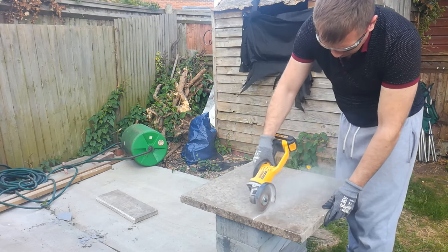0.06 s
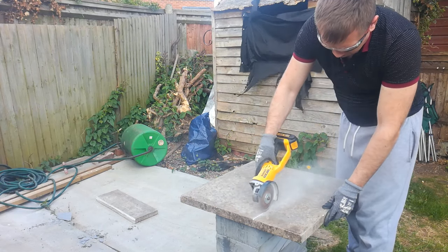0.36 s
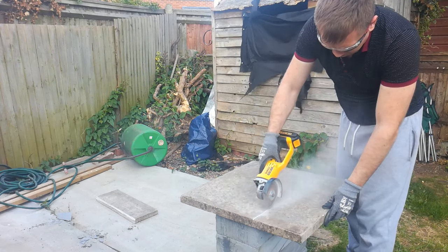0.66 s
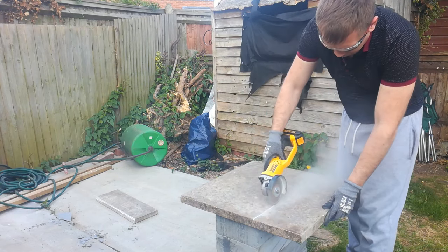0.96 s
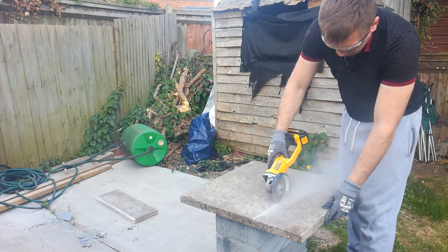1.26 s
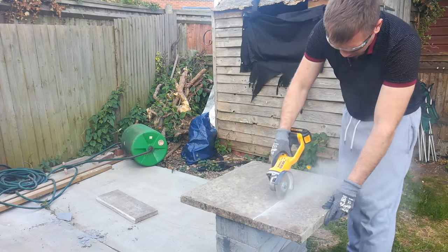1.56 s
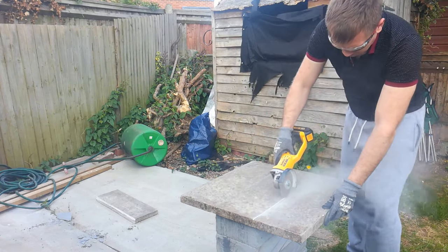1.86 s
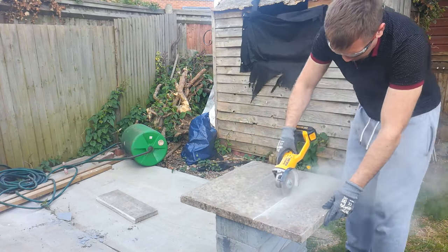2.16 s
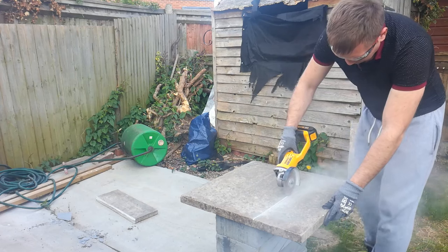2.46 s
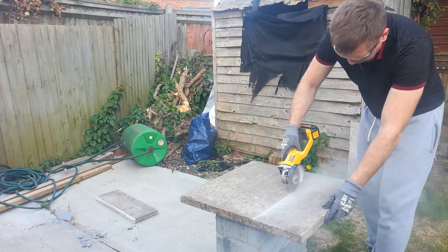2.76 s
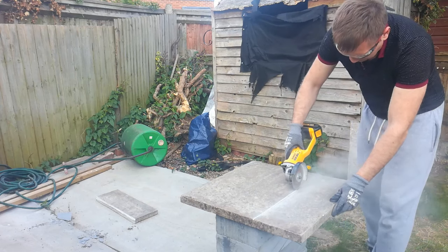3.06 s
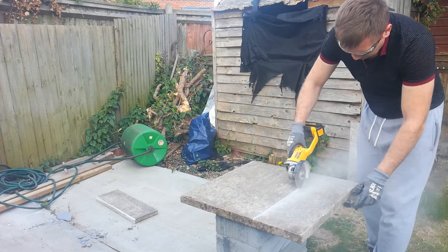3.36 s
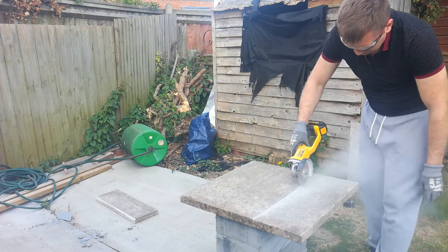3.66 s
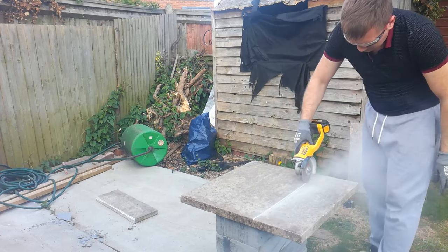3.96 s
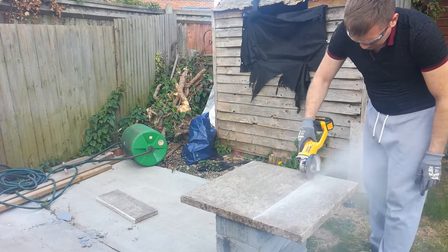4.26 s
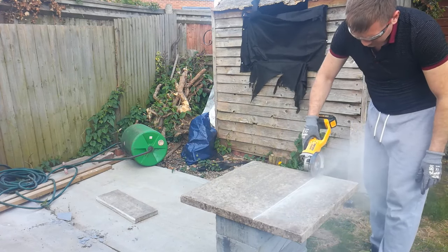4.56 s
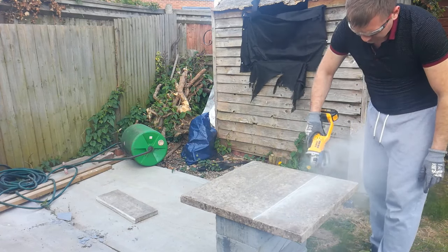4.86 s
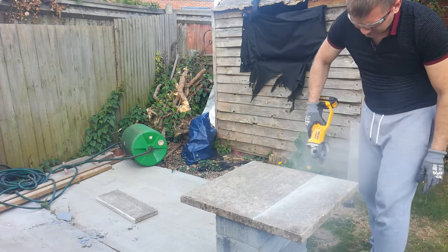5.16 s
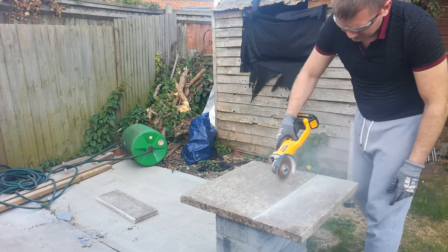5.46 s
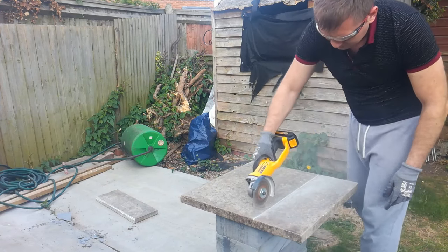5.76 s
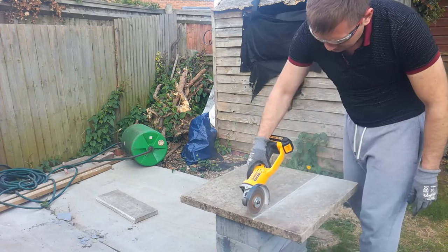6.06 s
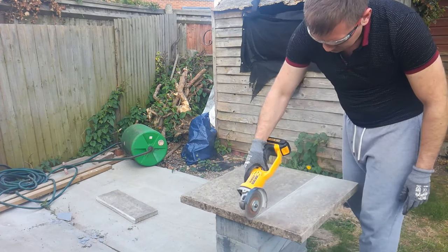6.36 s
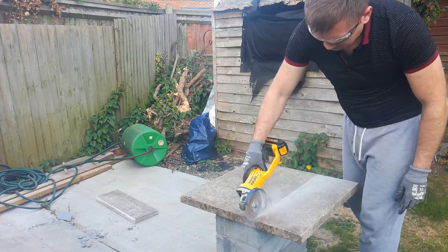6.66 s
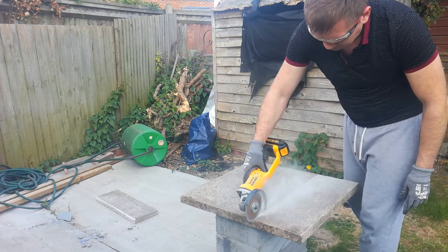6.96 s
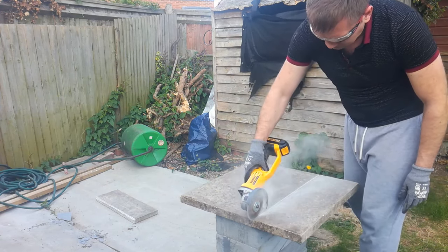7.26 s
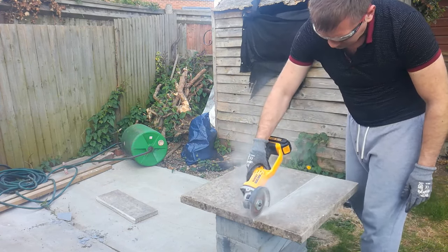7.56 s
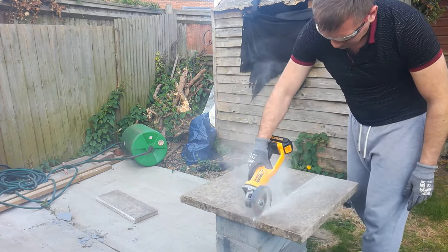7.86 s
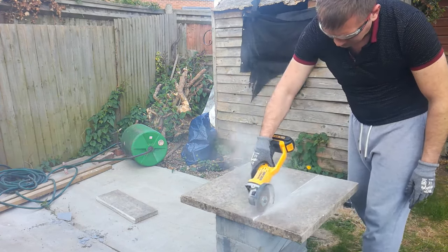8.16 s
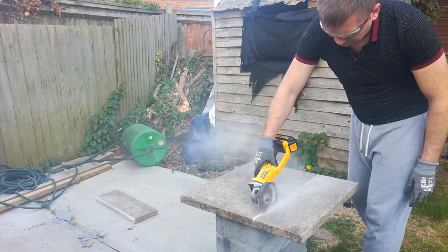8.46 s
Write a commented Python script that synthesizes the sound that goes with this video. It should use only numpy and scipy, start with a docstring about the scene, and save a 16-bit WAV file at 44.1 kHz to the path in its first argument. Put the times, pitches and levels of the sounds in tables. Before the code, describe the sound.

A cordless angle grinder is already cutting a concrete slab, with a gritty hiss, steely ringing and a swelling drone. Just past halfway the disc lifts out and briefly coasts down, then spins up with a strained gear whine. It bites again, sagging in pitch and squealing as the rim catches. The yard adds short echoes, and a rising breeze rumbles on the microphone during the second cut.

```python
"""A cordless angle grinder scores a concrete slab in a fenced yard. It opens mid-cut: the diamond disc scrapes
and rings over a swelling friction drone. Near 4.9 s it is lifted out, coasts down with the trigger released,
then spins up again with a strained gear whine. At 6.2 s it bites a second score, where the load drags its speed
down and the disc squeals, while a rising breeze buffets the microphone."""
import sys
import numpy as np
from scipy import signal
from scipy.fft import rfft, irfft, next_fast_len
from scipy.io import wavfile
from scipy.ndimage import map_coordinates

SR = 44100
rng = np.random.default_rng(int(sys.argv[2]) if len(sys.argv) > 2 else 0)


def master(y):
    """Save y as 16-bit WAV."""
    cut = np.clip(np.atleast_2d(y).T, -1, 1)
    pcm = np.round(cut * 32767)  # scale
    wavfile.write(sys.argv[1], SR, pcm.astype(np.int16))


N = 380141
TIME = np.arange(N) / SR
LIFT_S, RELEASE_S, PRESS_S, BITE_S = 4.885, 5.16, 5.705, 6.217  # disc out, trigger off, on, disc in
FREE_SPEED = 100  # unloaded disc, turns/s
GEAR_ORDER, PINION_ORDER, WHISTLE_ORDER = 32, 39 / 11, 9.69  # cycles per disc turn

# EQ of the cut's body, bite and top end: f/Hz, level/dB
SCRAPE_EQ = [(60, -87), (300, -25.5), (500, -18.5), (800, -15.5), (1500, -9), (1900, -7), (2300, -3),
             (3000, 4.5), (4300, 2.5), (5300, -11), (7000, -3.5), (10000, -32)]
GRIT_EQ = [(2000, -29), (4600, -5), (5300, -4.5), (6000, -3.5), (6700, -1.5), (8000, -1), (11000, 1),
           (12000, -6.5), (13000, -32), (16000, -32)]
SIZZLE_EQ = [(9000, -47), (11500, -17), (12500, -2), (13300, -5.5), (15700, -1.5)]
# fader rides, one list per score: t/s, grit/dB, sizzle/dB
CUT_RIDES = [
    [(0.05, -24, -28), (0.08, -24.5, -27), (0.93, -25.5, -28.5), (1.62, -22, -24), (1.83, -23, -25.5),
     (2.54, -22, -24), (2.73, -23.5, -28), (4.82, -23.5, -28), (4.86, -22.5, -27)],
    [(6.24, -24, -28), (6.26, -28.5, -32), (6.53, -23.5, -24.5), (7.69, -24.5, -24.5), (7.73, -22.5, -22),
     (7.96, -26.5, -24.5), (8.22, -22.5, -21.5), (8.51, -24.5, -25.5), (8.62, -20.5, -22)],
]
# hard stones that the rim bites through: t/s, accent/dB
STONES = [(1.595, 3), (2.57, 0.5), (3.315, 2), (3.68, 2), (6.345, 2.5), (6.97, 3.5), (7.23, 2.5)]
# bending modes of the steel disc: f/Hz, width/Hz, boost in first score/dB, in second score/dB
DISC_MODES = [(2223, 157, 7, 4), (4766, 75, 8.5, 6.5), (4957, 52, 7, 7.5), (5616, 37, 13, 10),
              (6290, 150, 5, 5), (6816, 120, 5, 8), (7130, 150, 5.5, 9), (7766, 225, 8, 9),
              (8610, 184, 8, 10.5), (9880, 300, 5.5, 7), (10500, 150, 1.5, 4), (10720, 66, 9.5, 0),
              (11600, 390, 7, 7), (12730, 115, 7, 12), (13800, 130, -2, 8), (14200, 60, 11.5, 9),
              (15300, 170, 0, -10)]
# low modes of the binding disc, one list per score: f/Hz, width/Hz, level/dB
CHATTER_MODES = [
    [(1082, 9.9, 5.5), (1156, 39, -9), (1190, 52, -16), (1338, 25, -6), (1772, 36, -0.5)],
    [(1086, 12, -4), (1144, 28, -3.5), (1210, 22, 2.5), (1821, 45, -0.5)],
]
# chatter ride, one list per score: t/s, level/dB
CHATTER_RIDES = [
    [(0.0, -51.5), (0.9, -49), (1.75, -46), (2.0, -50), (2.3, -49), (2.9, -49), (3.2, -50.5), (4.15, -50.5),
     (4.69, -42.5), (4.88, -42)],
    [(6.22, -51), (6.55, -40), (6.9, -44), (7.05, -44.5), (7.4, -42.5), (7.75, -41.5), (7.86, -43),
     (8.15, -37.5), (8.45, -39), (8.62, -39.5)],
]
# buzz of the uneven rim: multiple of disc speed, level in first score/dB, in second score/dB
RIM_BUZZ = [(2, -20.5, -13), (8, -11, -16.5), (9, -19, -17.5), (13, -8, -11.5), (14, -9, -5.5),
            (15, -9.5, -24), (16, -33, -8.5), (18, -12, -12.5)]
# ride of the disc's lowest mode: t/s, level/dB
DRONE_RIDE = [(0, -67), (.9, -55), (1.35, -46.5), (2.0, -44), (2.4, -38.5), (2.74, -39), (2.82, -45),
              (3.05, -41.5), (3.4, -45), (3.87, -59), (4.2, -45), (4.5, -36.5), (4.61, -36.5),
              (4.72, -31.5), (4.85, -29.5), (4.92, -47), (5.15, -72), (6.4, -63), (6.55, -41), (6.61, -59),
              (6.68, -47), (6.85, -40), (7.08, -51), (8.62, -57)]
# squeals, each a disc mode that swells and breaks off: peak t/s, swell/s, f/Hz, waver/Hz, level/dB
SQUEALS = [(0.029, .1, 1222, 4, -41), (.25, .1, 1217, 4, -41), (2.169, 0.062, 1154, 21, -38),
           (2.339, .1, 1130, 20, -39), (2.48, 0.1, 1145, 22, -43), (4.71, 0.28, 1230, 11.5, -42.5),
           (4.88, 0.055, 1216, 10, -40), (6.42, .04, 1760, 6, -38), (6.53, 0.09, 1196, 3, -39.5),
           (6.571, 0.055, 1100, 13, -38.5), (6.709, 0.045, 1212, 3.3, -36.5), (6.9, 0.081, 1215, 2.4, -35),
           (6.99, .04, 5600, 20, -33), (7.21, .09, 5660, 20, -35), (7.319, .05, 1797, 7.5, -40),
           (7.48, 0.072, 1210, 3, -40.5), (7.67, 0.042, 1222, 2.9, -32.5), (7.77, 0.12, 1214, 3.3, -33),
           (7.92, .025, 1183, 4.6, -36.5), (8.08, 0.058, 2240, 5.4, -33.5), (8.275, 0.17, 1210, 2.6, -26.5),
           (8.32, 0.027, 1794, 6.2, -36.5), (8.42, 0.07, 1050, 2.9, -33), (8.53, .13, 1222, 3.65, -32)]
# disc speed under load, one list per score: t/s, speed/(turns/s)
LOADED_SPEED = [
    [(0, 92.7), (.6, 91.9), (.95, 92.3), (1.6, 90.1), (2.35, 89), (2.9, 89.5), (3.65, 89.1), (4.25, 89.6),
     (4.85, 88.4)],
    [(6.3, 98.5), (6.6, 91.3), (6.85, 86.6), (7.1, 86.4), (7.35, 84), (7.6, 82), (7.9, 78.9), (8.3, 81.3),
     (8.62, 80.2)],
]
# gear whine under load, one list per score: t/s, level/dB
WHINE_RIDES = [
    [(0, -29.5), (.65, -31), (1.2, -40.5), (4.85, -38)],
    [(6.3, -36), (6.6, -33), (6.95, -28.5), (7.2, -31), (7.35, -36.5), (7.7, -34.5), (8.1, -39),
     (8.62, -41)],
]
# motor shaft partials: multiple of shaft speed, level/dB, boost at full torque/dB
SHAFT_PARTIALS = [(1, -53.5, -6), (2, -56.5, -6), (8, -37.5, 6), (9, -49.5, 13), (10, -52, 20),
                  (20, -47, -8)]
# how the housing colours the mechanics: f/Hz, gain/dB
HOUSING_EQ = [(620, -14.5), (720, -6), (825, 2.5), (900, 1), (980, -3), (1900, -7), (2250, -7), (2550, 0),
              (3150, -3), (3700, 4), (4400, 2.5), (4680, 6.5), (5100, 2.5), (6200, -2), (6800, -6),
              (8000, -8)]
# colour of the cooling air: f/Hz, level/dB
AIR_EQ = [(88, -55), (150, -37), (270, -34), (370, -18.5), (646, -26.5), (815, -14), (1030, -14.5),
          (2240, -8), (2620, -3.5), (3400, -1.5), (4200, -7), (5500, -3.5), (15700, -19)]
# the lifted disc turns to the microphone and away: t/s, hiss gain/dB, low ring/dB, high ring/dB
LIFTED_RIDE = [(4.95, -0.5, -54, -44), (5.18, -0.5, -47, -48), (5.3, 2.5, -44, -57), (5.55, 1.5, -42, -64),
               (5.8, -0.5, -60, -64), (5.95, -1, -65, -64), (6.25, -0.5, -58, -55)]
# disc modes that sing in the air stream: f/Hz, width/Hz, level/dB
AIR_MODES = [(4690, 60, 0), (6850, 170, 0)]
# the left channel lags as the tool moves along the slab: t/s, delay/ms
LEFT_DELAY = [(0, 0.069), (2, 0.095), (4.7, 0.13), (6, 0.06), (8.6, 0.063)]
# shading of the two microphone ports: f/Hz, left over right/dB
PORT_BALANCE = [(300, -0.5), (500, 1.5), (623, -9), (870, 10), (1070, -10.5), (1212, 1), (1900, 7),
                (2500, -0.5), (3000, -6), (3600, 0.5), (4000, 5), (5500, 1), (8000, -8.5), (15000, -8.5)]
# reverb time of the yard: f/Hz, t60/s
YARD_DECAY = [(200, 0.0065), (2000, 0.31), (12000, 0.069)]
# ride of the wind bed: t/s, level/dB
BREEZE_RIDE = [(0, -80), (3.2, -74), (3.5, -69), (4.2, -67), (4.7, -71), (5.7, -76), (5.92, -57.5),
               (6.5, -48.5), (8.62, -45)]
# single wind bumps: t/s, peak level/dB
GUSTS = [(3.52, -63), (4.15, -60), (5.97, -59), (6.19, -46), (6.54, -41), (6.78, -42.5), (7.23, -38.5),
         (7.42, -39), (7.64, -38), (8.26, -39)]


def score(turns, index, runout_db, lumps_db, chips_db, repeat, scrape_db, grit_db, sizzle_db, chatter_db):
    """One cut: the rim grinds through the stones of the slab and rings the disc."""
    grit_ride, sizzle_ride = curves(CUT_RIDES[index])
    scrape_follows = (0.72, 0.95)[index]  # dB of scrape per dB of grit
    scrape_ride = scrape_follows * (grit_ride - np.mean(CUT_RIDES[index], axis=0)[1])
    chatter_ride, = curves(CHATTER_RIDES[index])
    # the high side of the disc bites once a turn; pebbles and breaking chips jolt it at random
    angle = 2 * np.pi * turns
    bite_db = runout_db * (np.cos(angle) + 0.087 * np.cos(2 * angle - 0.9))
    bite_db += lumps_db * (wobble(170) + 0.29 * wobble(28))
    bite_db += chips_db * (0.4 * roughness(turns, wear_rate=8, size=12) + 0.95 * wobble(1100))
    bite_db += sum(db * bump(s, width_s=0.018) for s, db in STONES)
    # repeat is the share of the friction's power that loops with each turn
    force = np.sqrt(repeat) * roughness(turns, wear_rate=3, size=128) + np.sqrt(1 - repeat) * noise()
    friction = [force * amp(0.6 * bite_db), noise() * amp(bite_db), noise() * amp(0.77 * bite_db)]
    steel = filtered(friction, lambda hz: disc_response(hz, index))
    scrape = amp(scrape_ride + scrape_db) * coloured(steel[0], SCRAPE_EQ)
    grit = amp(grit_ride + grit_db) * coloured(steel[1], GRIT_EQ)
    sizzle = amp(sizzle_ride + sizzle_db) * coloured(steel[2], SIZZLE_EQ)
    # a binding disc chatters in its low modes and buzzes in step with its turning
    buzz = sum(amp(db[index]) * tone(turns, order=round(k), waver=0.59) for k, *db in RIM_BUZZ)
    chatter = amp(chatter_ride + chatter_db) * (ringing(force, CHATTER_MODES[index]) + buzz)
    return contact(index) * (scrape + grit + sizzle + chatter)


def disc_response(hz, index):
    """The disc's bending modes give the friction its steely colour."""
    peaks = sum((amp(boost_db[index]) ** 2 - 1) / (1 + (2 * (hz - centre) / width) ** 2)
                for centre, width, *boost_db in DISC_MODES)
    return np.sqrt(1 + peaks.clip(-.5))


def contact(index, attack_s=0.0064, release_s=0.023):
    """How firmly the rim sits in the slot, 0-1: score 0 fades on the lift, score 1 snaps in."""
    if index == 0:
        return np.exp(-since(LIFT_S) / release_s)
    return np.clip(since(BITE_S) / attack_s, 0, 1)


def singing(turns):
    """Friction keeps the disc's modes swinging: a wide low drone, a high ring and squeals."""
    drone_phase = wavering_phase(hz=622.7, waver_hz=2.22, rate=30)
    drone_db, = curves(DRONE_RIDE)
    spread_rad = np.array([[-1.18], [1.18]])
    drone = amp(drone_db + 1.9 * wobble(25)) * np.sin(drone_phase + spread_rad)
    squeal = squeals()
    ring = np.sin(wavering_phase(hz=5650, waver_hz=24, rate=120)) * amp(1.7 * wobble(90))
    ring *= amp(-43.5) * contact(0) + amp(-50) * contact(1)
    rim_tone = amp(-53.5) * contact(0) * tone(turns, order=7, waver=0.66)  # beats against the drone
    return np.sqrt(2) * (drone + ring + squeal * amp(0.64 * wobble(55))) + rim_tone


def squeals(release_s=0.048):
    """One disc mode after another swells and breaks off."""
    voice = np.zeros(N)
    drift = np.cumsum(wobble(70)) / SR
    for peak_s, swell_s, hz, waver_hz, db in SQUEALS:
        near = (TIME > peak_s - 3 * swell_s) & (TIME < peak_s + 3 * release_s)
        t = TIME[near] - peak_s
        envelope = amp(db) * np.exp(-(t / np.where(t < 0, swell_s, release_s)) ** 2)
        voice[near] += envelope * np.sin(2 * np.pi * (hz * t + waver_hz * drift[near]))
    return voice


def drive(spin_up_s=.115, coast_s=1.25, take_up_s=0.0978, torque_rise_s=0.04):
    """Speed, spin-up torque and whine gain: set by the load in a cut, by motor and inertia in air."""
    first_speed, second_speed = [curves(rows)[0] for rows in LOADED_SPEED]
    first_db, second_db = [curves(rows)[0] for rows in WHINE_RIDES]
    first_load, second_load = contact(0), np.clip(since(BITE_S) / take_up_s, 0, 1)
    # freed from the slab the motor speeds up, coasts without power, then spins up again
    freed_s = np.minimum(since(LIFT_S), RELEASE_S - LIFT_S)
    unpowered_s = np.minimum(since(RELEASE_S), PRESS_S - RELEASE_S)
    speed = FREE_SPEED - (FREE_SPEED - first_speed) * np.exp(-freed_s / spin_up_s)
    speed *= np.exp(-unpowered_s / coast_s)
    speed = FREE_SPEED - (FREE_SPEED - speed) * np.exp(-since(PRESS_S) / spin_up_s)
    torque = (1 - np.exp(-since(PRESS_S) / torque_rise_s)) * (1 - second_load)
    torque *= np.abs(1 - speed / FREE_SPEED) ** 0.57  # eases towards free speed
    idling = ((TIME < RELEASE_S) | (TIME > PRESS_S)) * (1 - first_load) * (1 - second_load)
    whine = first_load * amp(first_db) + second_load * amp(second_db)
    whine += idling * amp(-41) + torque * amp(-33)
    return speed + second_load * (second_speed - speed), torque, whine


def grinder(turns, speed, torque, whine):
    """The tool's own voice: air, plus gears, bearing, shaft and a whistle through the housing."""
    pace = speed / FREE_SPEED
    air = cooling_air(turns, pace)
    mechanics = gears(turns, pace, torque, whine) + bearing(turns, pace, torque)
    shaft = sum(amp(db + strain_db * torque) * tone(turns, order=round(k) * PINION_ORDER, waver=0.66)
                for k, db, strain_db in SHAFT_PARTIALS)
    whistle_db = -50.5 - 2 * contact(0) - 5 * contact(1)  # ducks in the cuts
    whistle = amp(whistle_db) * tone(turns, order=WHISTLE_ORDER, waver=0.35)
    return air + equalised(mechanics + shaft * pace ** 4 + whistle, HOUSING_EQ)


def gears(turns, pace, torque, whine):
    """Meshing teeth whine and rattle against the gearbox resonance."""
    angle = 2 * np.pi * turns
    runout = 1 + 0.33 * np.cos(angle)  # the crown wheel runs out of true, adding sidebands
    mesh = whine * tone(turns, order=GEAR_ORDER, waver=.3) * runout
    teeth = wobble(750) * np.sin(GEAR_ORDER * angle) + 0.55 * wobble(1100) * np.sin(2 * GEAR_ORDER * angle)
    gearbox = ringing(noise(), [(3260, 630, 0)])
    rattle = unit((teeth + 0.88 * gearbox) * amp(4 * np.cos(angle)))  # a clash once a turn
    rattle_gain = amp(-46.5) * pace + amp(-32) * torque + amp(-3.5) * whine * (contact(0) + contact(1))
    return mesh + rattle * rattle_gain


def bearing(turns, pace, torque, cage_order=13 / 11, race_order=27):
    """A worn ball race buzzes in two bands, its roughness returning with every lap of the cage."""
    laps = cage_order * turns
    phase = 2 * np.pi * race_order * laps
    buzz = unit(roughness(laps, wear_rate=4, size=14) * (np.sin(phase) + .5 * np.sin(2 * phase)))
    return buzz * amp(3 * np.cos(2 * np.pi * turns)) * (amp(-43) * pace + amp(-35) * torque)


def cooling_air(turns, pace, hiss_hz=4300):
    """Air rushes harder with speed, pulsing once a turn; the disc hisses and sings in the stream."""
    hiss_db, *ring_db = curves(LIFTED_RIDE)
    rush = amp(-36.5) * coloured(noise() * amp(3.8 * np.cos(2 * np.pi * turns)), AIR_EQ)
    hiss = filtered(rush, lambda hz: 1 - 1 / (1 + (hz / hiss_hz) ** 8))
    ring = sum(amp(db) * ringing(noise(), [mode]) for db, mode in zip(ring_db, AIR_MODES))
    return (rush + (amp(hiss_db) - 1) * hiss) * pace ** 1.43 + ring


def yard(x, count, blur_ms=0.031):
    """Short, wide echoes off fence, shed and paving; tails crossfade at random as the tool moves."""
    hz, t, spectra = signal.stft(rng.standard_normal((count, 2, SR // 4)), SR, nperseg=256)
    decay = amp(-60 * t / along(YARD_DECAY, hz)[:, None])
    tails = signal.istft(spectra * decay, SR, nperseg=256)[1]
    sends = np.array([wobble(4) for _ in tails])
    sends /= np.linalg.norm(sends, axis=0)
    echo = sum(signal.oaconvolve((x * send)[None], tail / np.linalg.norm(tail[0]), axes=1)[:, :N]
               for send, tail in zip(sends, tails))
    # a fluttering delay smears the treble
    echo = [map_coordinates(side, [np.arange(N) + blur_ms * SR / 1000 * wobble(130)]) for side in echo]
    return equalised(echo, [(600, -3.0), (1300, -5.0), (2500, -3.5), (12000, 1)])


def wind(gust_s=0.027):
    """A breeze gets up and throws soft low gusts at the microphone."""
    breeze_db, = curves(BREEZE_RIDE)
    bed = amp(breeze_db) * unit(amp(4.4 * wobble(14)))
    gusts = sum(amp(db) * bump(s, gust_s) for s, db in GUSTS)
    rumble_eq = [(15, -1.0), (40, 1.5), (85, 1.5), (150, -7.5), (250, -15.0), (500, -36), (1500, -67)]
    centre, *sides = [coloured(noise(), rumble_eq) for _ in range(3)]
    return (bed + gusts) * (centre + amp(-6.5) * np.array(sides))


def roughness(turns, wear_rate, size):
    """A surface texture that loops on every turn and slowly wears into a new shape."""
    surface = rng.standard_normal((int(N / SR * wear_rate) + 4, size))
    return unit(map_coordinates(surface, [TIME * wear_rate, turns % 1 * size], mode="grid-wrap"))


def tone(turns, order, waver):
    """A slightly unsteady partial at a multiple of the disc speed, rms 1."""
    return unit(np.sin(2 * np.pi * order * turns + waver * wobble(45)) * amp(1.9 * wobble(22)))


def wavering_phase(hz, waver_hz, rate):
    """Phase of a pitch with random vibrato."""
    return 2 * np.pi * np.cumsum(hz + waver_hz * wobble(rate)) / SR


def ringing(x, modes):
    """x through damped modes (f/Hz, width/Hz, level/dB), at rms 1."""
    def response(hz):
        return sum(amp(db) * 1j * hz * width / (centre ** 2 - hz ** 2 + 1j * hz * width)
                   for centre, width, db in modes)
    return unit(filtered(x, response))


def filtered(x, response):
    """x times a complex response of frequency."""
    size = next_fast_len(N + SR // 4)
    return irfft(rfft(x, size) * response(np.fft.rfftfreq(size, 1 / SR)), size)[..., :N]


def equalised(x, eq):
    """x through an EQ curve (f/Hz, gain/dB)."""
    return filtered(x, lambda hz: amp(along(eq, hz)))


def coloured(x, eq):
    """x through an EQ curve, at rms 1."""
    return unit(equalised(x, eq))


def along(points, hz):
    """Interpolate (f/Hz, value) points on a log axis."""
    freqs, values = np.transpose(points)
    return np.interp(np.log(hz + 1), np.log(freqs + 1), values)


def curves(rows):
    """One automation lane for each column after the time."""
    times, *columns = np.transpose(rows)
    return [np.interp(TIME, times, column) for column in columns]


def since(cue_s):
    """Seconds after a cue, 0 before it."""
    return np.maximum(TIME - cue_s, 0)


def bump(peak_s, width_s):
    """A bell-shaped envelope, down to 1/e at width_s from its peak."""
    return np.exp(-((TIME - peak_s) / width_s) ** 2)


def wobble(rate):
    """A smooth random curve, rate knots a second."""
    return map_coordinates(rng.standard_normal(int(N * rate / SR) + 4), [TIME * rate])


def noise():
    """Fresh white noise."""
    return rng.standard_normal(N)


def amp(db):
    """Decibels to gain."""
    return 10 ** (np.asarray(db) / 20)


def unit(x):
    """Scale to rms 1."""
    return x / np.sqrt(np.mean(x ** 2) + 1e-20)


def scene():
    """The mix: the grinder works right of the microphone, with the yard's echoes and wind around it."""
    speed, torque, whine = drive()
    turns = np.cumsum(speed) / SR
    tool = amp(1.0) * grinder(turns, speed, torque, whine)
    cuts = score(turns, index=0, runout_db=6.0, lumps_db=1.47, chips_db=2.0, repeat=0.12,
                 scrape_db=-28.5, grit_db=1.1, sizzle_db=3.0, chatter_db=-0.5)
    cuts += score(turns, index=1, runout_db=2.0, lumps_db=0.86, chips_db=2.5, repeat=0.094,
                  scrape_db=-28.0, grit_db=2.0, sizzle_db=2.0, chatter_db=0.0)
    delay_ms, = curves(LEFT_DELAY)
    right = tool + cuts
    left = map_coordinates(right, [np.arange(N) - delay_ms * SR / 1000], order=5)
    echoes = yard(cuts + amp(-3) * tool, count=5)  # the housing sits drier than the cut
    stereo = np.array([left, right]) + echoes + singing(turns)
    # the body that holds the microphone shades each port in its own bands
    shading = lambda hz: np.sqrt(2 / (1 + amp(np.outer([-2, 2], along(PORT_BALANCE, hz)))))
    return filtered(stereo, shading) + wind()


def record(dry, top_hz=15800):
    """A brick-wall low-pass on the master."""
    return filtered(dry, lambda hz: hz < top_hz)


dry = scene()
out = record(dry)
master(out)
```